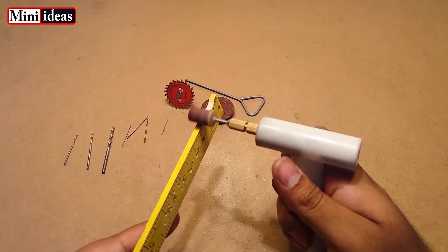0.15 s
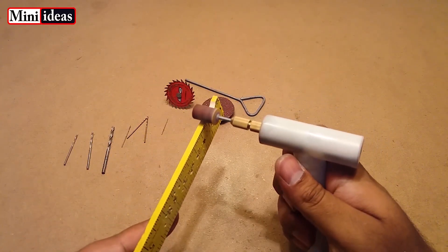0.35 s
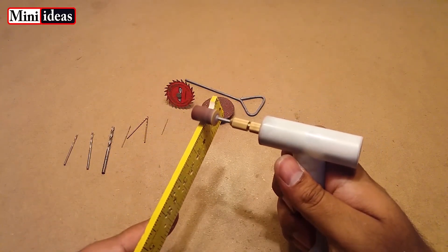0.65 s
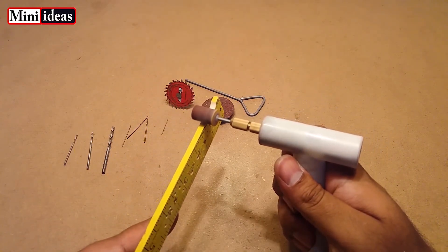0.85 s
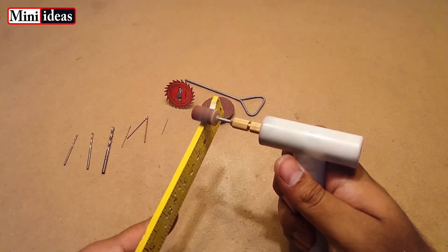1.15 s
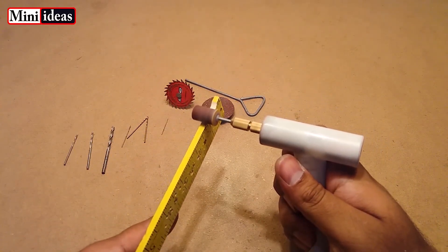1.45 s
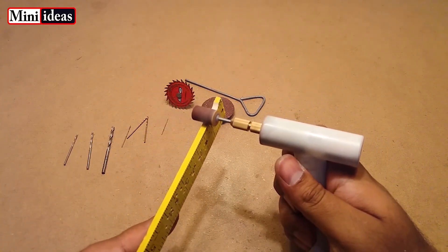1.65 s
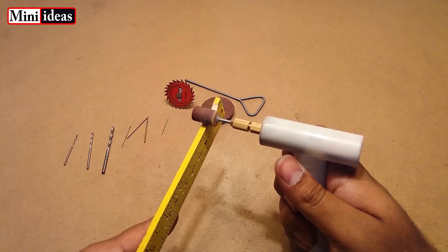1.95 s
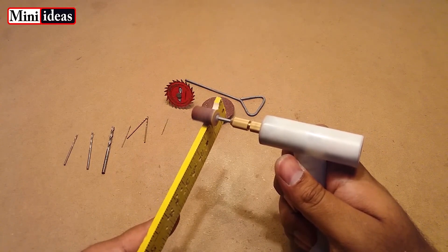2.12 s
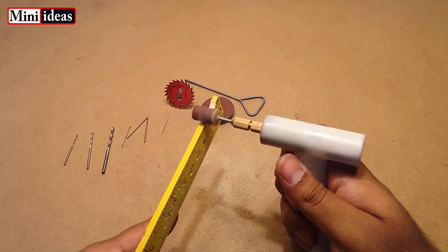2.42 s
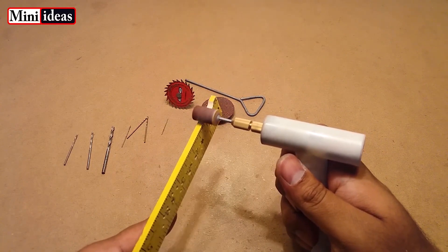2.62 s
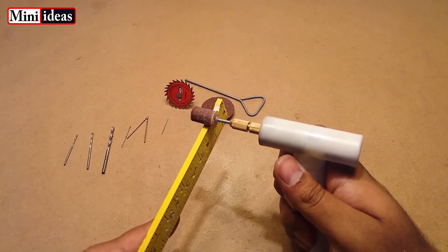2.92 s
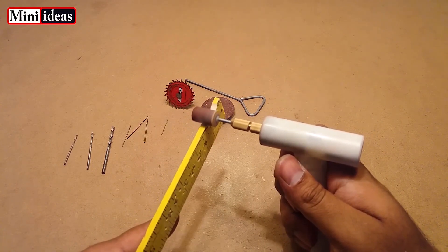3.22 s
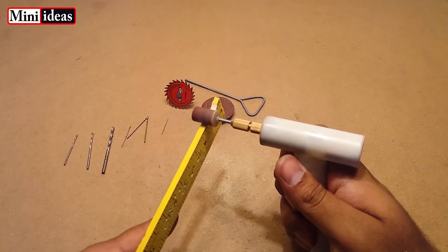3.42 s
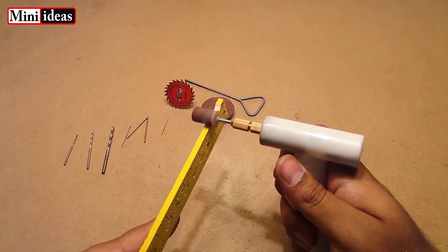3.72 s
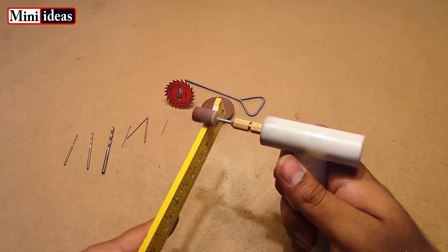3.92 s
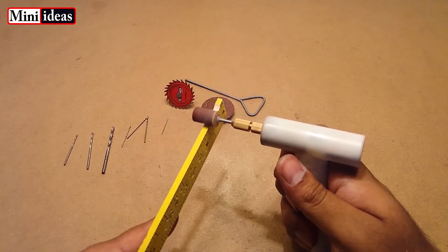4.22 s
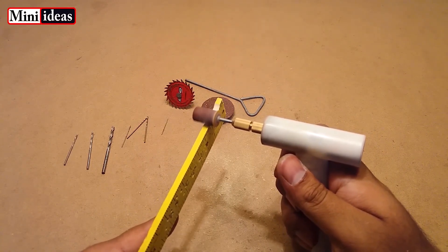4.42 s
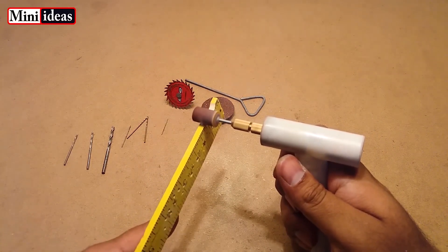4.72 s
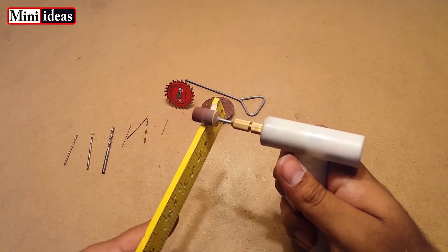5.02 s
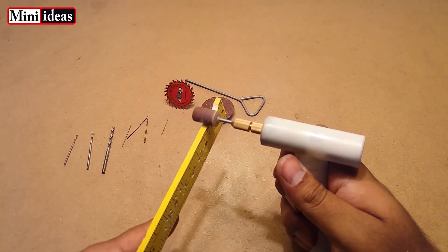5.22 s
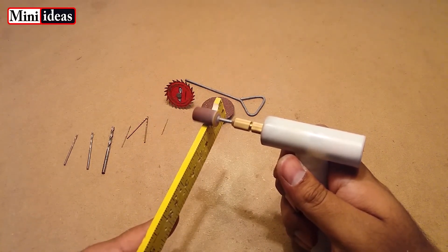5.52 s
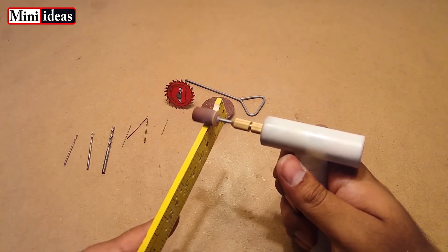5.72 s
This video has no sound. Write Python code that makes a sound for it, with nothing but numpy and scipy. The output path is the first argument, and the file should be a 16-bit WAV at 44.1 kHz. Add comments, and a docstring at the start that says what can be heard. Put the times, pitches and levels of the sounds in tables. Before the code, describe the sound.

Heard up close in a quiet room, a little motor-driven grinding stone whines against the edge of a steel tape measure. The pitch falls as it bogs down, turning into a gritty, chattering buzz with brief ringing tones from the blade. After a short surge the motor cuts out for a moment, jerks back to life and keeps grinding unevenly, slowing to a rattle once more before picking up speed.

```python
'''On a table, close by, a small hand-made drill presses a grinding stone against a steel tape measure.
The stone's high spot knocks on the blade's edge once a turn while its grit scrapes, and both excite
the resonances of the steel: the faster it turns, the louder and clearer. The blade skips at full speed,
and sings and whistles on multiples of the rotation rate; the unbalanced spindle hums, the motor growls.
Now and then the stone bites and drags the motor down; the drill stops briefly, restarts and labours on.'''
import sys
import numpy as np
from scipy import signal
from scipy.fft import rfft, irfft
from scipy.io import wavfile
from scipy.ndimage import uniform_filter1d

SR = 44100
rng = np.random.default_rng(int(sys.argv[2]) if len(sys.argv) > 2 else 0)


def to_wav(s):
    """Save 16-bit WAV."""
    ch = np.atleast_2d(s).T  # columns
    pcm = np.round(np.clip(ch, -1, 1) * 32767)  # PCM
    wavfile.write(sys.argv[1], SR, pcm.astype(np.int16))


N = 258426

# The stone bites into the edge. Each row: start and end in seconds, share of the speed lost,
# then dB added to knock, hard bite and steadiness.
STONE_BITES = [(0.714, 0.773, 0.084, -1.5, 2, 0.5), (.85, .9, 0.015, -1, 5, -1.5),
               (1.155, 1.25, .13, 2.5, 2.6, -0.5), (1.25, 1.32, .08, 0.5, 2.5, -3.5),
               (1.389, 1.44, 0.16, 1, 2.5, -2), (1.515, 1.555, 0.17, 4, 5.5, -1),
               (1.635, 1.68, 0.16, 3, 1.5, -8), (2.408, 2.479, .12, 5, 5, -5),
               (3.543, 3.592, 0.14, 4.5, 3, -10.5), (3.63, 3.69, 0.22, 3, 7, -5),
               (3.675, 3.765, 0.13, 3.5, 7.5, -0.5), (3.89, 3.975, .2, 5, 8, -1.5),
               (4.1, 4.16, 0.2, 5.5, 7.5, -4), (4.16, 4.235, 0.094, 2, 3, -3),
               (4.3, 4.414, 0.12, 3, 5.5, -7), (4.44, 4.57, 0.15, 0.5, 3, -1.5),
               (5.59, 5.698, 0.13, 1, 6, 1)]
# The drill runs down, rests and starts with a jerk. Each row: time in seconds, gain in dB.
MOTOR_RUNNING = [(2.76, -3), (2.82, -8.5), (2.87, -35), (2.992, -45), (3.002, -14.5), (3.045, -1)]
# The blade's main resonance moves with the point of contact.
# Each row: time in seconds, frequency in Hz, relative strength in dB.
MAIN_RESONANCE = [(0, 1360, 1), (.33, 1130, 2), (.42, 1070, -9), (.5, 1540, -6), (.68, 1510, 7),
                  (.95, 1750, -13), (1.4, 1600, 8), (1.58, 1500, 6.5), (1.8, 1200, -28), (2.3, 1070, 6.5),
                  (2.46, 1556, 6), (2.7, 1200, -3), (3.3, 1140, -24), (3.55, 1139, -2), (3.72, 1560, -12),
                  (3.85, 1770, 2.5), (4.35, 1787, 3.5), (4.55, 1681, 8), (4.74, 1646, -5), (4.86, 1095, 12),
                  (5.3, 1130, -3), (5.5, 1405, 5.5), (5.86, 1160, -9)]


def from_db(db):
    """Decibels as an amplitude ratio."""
    return 10 ** (np.asarray(db) / 20)


def unit_power(x):
    """Normalisation to a mean square of one."""
    return x / np.sqrt(np.mean(x ** 2) + 1e-20)


def evened(x, size=1100):
    """Gain control: the running power is held at one."""
    power = uniform_filter1d(uniform_filter1d(x ** 2, size), size)
    return x / np.sqrt(np.maximum(power, 0) + 1e-6 * np.mean(x ** 2))


def look_up(rows, at):
    """Linear interpolation of a table's later columns along its first."""
    axis, *columns = np.transpose(rows)
    return [np.interp(at, axis, column) for column in columns]


def in_time(rows):
    """Interpolation of a timed table at every sample."""
    return look_up(rows, np.arange(N) / SR)


def during(rows, column, start_lag_s=0, end_lag_s=0, ramp_s=.03):
    """Superposed trapezoids: each row's value sets in, holds and lets go."""
    t, total = np.arange(N) / SR, np.zeros(N)
    for row in rows:
        inside_s = np.minimum(t - row[0] - start_lag_s, row[1] + end_lag_s - t)
        total += row[column] * np.clip(inside_s / ramp_s + .5, 0, 1)
    return total


def band(x, edges_hz, kind, order=4):
    """Filtering with a maximally flat passband."""
    return signal.sosfilt(signal.butter(order, edges_hz, kind, fs=SR, output="sos"), x)


def coloured(x, spectrum, modes=(), size=8192):
    """Minimum-phase filtering: resonant peaks stand on a broad spectrum of (Hz, dB) points."""
    hz = np.maximum(np.fft.rfftfreq(size, 1 / SR), 1)
    points = np.array(spectrum)
    db = np.interp(np.log(hz), np.log(points[:, 0]), points[:, 1])
    db = db + sum(lift / (1 + (2 * (hz - centre) / width) ** 2) for centre, width, lift in modes)
    cepstrum = irfft(np.log(from_db(db)))[:size // 2]
    cepstrum[1:] *= 2
    response = irfft(np.exp(rfft(cepstrum, size)))[:size // 2]
    return signal.fftconvolve(x, response)[:N]


def clicks(turns, at_turn, sizes):
    """Fractional delay: an impulse at each given spindle angle is shared between two samples."""
    at = np.interp(at_turn, turns, np.arange(N)).ravel()
    sizes = (sizes * (at_turn > turns[0]) * (at_turn < turns[-1])).ravel()
    whole, part = at.astype(int), at % 1
    before = np.bincount(whole, sizes * (1 - part), N + 1)
    after = np.bincount(whole + 1, sizes * part, N + 1)
    return (before + after)[:N]


def harmonic(cycles, k):
    """A sinusoid locked to k times a rate, with a random starting phase."""
    return np.sin(2 * np.pi * (k * cycles + rng.random()))


def harmonics_near(turns, speed, centre_hz, width_hz, count=34):
    """Forced vibration: each harmonic of the rotation swells as it passes through a resonance."""
    return np.sqrt(2) * sum(np.exp(-.5 * ((k * speed - centre_hz) / width_hz) ** 2) * harmonic(turns, k)
                            for k in range(1, count + 1))


def spindle_speed(lag_s=.055):
    """Inertia: every bite brakes the motor, whose speed in turns per second follows with a lag."""
    # The spindle between bites. Each row: time in seconds, speed in turns per second.
    free_speed = [(0.0, 506.0), (0.24, 503.6), (0.363, 379.7), (0.575, 251.7), (0.917, 200.4),
                  (1.315, 185.4), (1.61, 155.3), (1.783, 126.9), (1.97, 89.1), (2.277, 231.1),
                  (2.363, 212.3), (2.577, 117.3), (2.882, 30.6), (2.98, 30.2), (3.141, 161.0),
                  (3.292, 182.5), (3.545, 191.9), (3.87, 181), (4.09, 166), (4.29, 170), (4.69, 153),
                  (4.8, 112), (4.88, 80), (5.12, 62), (5.27, 123), (5.39, 150), (5.58, 144.5),
                  (5.86, 146.5)]
    decay = np.exp(-1 / (lag_s * SR))
    drag = signal.lfilter([1 - decay], [1, -decay], during(STONE_BITES, column=2))
    return in_time(free_speed)[0] * (1 - drag)


def contact(speed, take_hold_s=.022, let_go_s=.0075):
    """Friction: speed and load set four levels and the steadiness (periodic over random sound), in dB."""
    # Faster turning is mostly louder and more regular. Each row: speed in turns per second,
    # then base thud, knock, hard bite, scrape and steadiness in dB.
    by_speed = [(61, -53, -43.5, -43.5, -37.5, -2), (96, -49.5, -39.5, -40.5, -38, 5.5),
                (143.73, -47.5, -34, -36.5, -37.5, 11), (193, -46.5, -32.5, -31.5, -34.5, 12.5),
                (253, -43.5, -32, -26, -28.5, 15), (370, -43.5, -32, -26.5, -30.5, 7),
                (516, -42, -30, -25.5, -36, 1.5)]
    # How firmly the hand holds edge and stone together. Each row: time in seconds, pressure in dB.
    hand_pressure = [(0, 1.5), (.15, 1.5), (.4, 1), (1.1, 3.5), (1.8, 5), (1.95, -2), (2.25, -0.5),
                     (2.5, 1.5), (2.78, 5), (3.02, 1.5), (3.15, -11), (3.21, -0.5), (3.65, -1),
                     (4.25, -0.5), (4.75, 1.5), (5.03, -3), (5.25, 3), (5.4, -2.5), (5.73, -2.5), (5.86, 1)]
    # The fine scrape swells and fades. Each row: time in seconds, gain in dB.
    scrape_swell = [(0, -3.5), (.28, 4), (.4, 0.1), (1.1, 2), (1.6, 4), (1.95, 0.5), (2.17, 1.5),
                    (2.28, -4.5), (2.5, 2), (2.76, 2), (3.13, -4), (3.22, -2), (4.3, -0.5), (4.9, 0),
                    (5.03, -5.5), (5.2, 0.5), (5.45, -1.5), (5.86, -2.5)]
    # The stone runs clean or chatters at no cost in speed.
    # Each row: start and end in seconds, then dB added to knock, hard bite and steadiness.
    spells = [(.095, .232, 0.5, 1.5, 7), (.3, .6, 1.5, -0.5, -2.5), (.665, .725, 1, 1.5, 5.5),
              (1.06, 1.15, .5, 1.5, 2), (1.29, 1.385, -0.5, -.5, 1), (1.46, 1.52, -0.5, 1, 6),
              (1.555, 1.61, -3, 1, 3), (1.72, 1.8, -0.5, -1, 4), (1.83, 2.17, 0, 1.5, -10),
              (2.19, 2.31, 3.5, .5, -11.5), (2.33, 2.405, 0.5, -2, 6), (2.47, 2.61, -0.5, 1.5, 1),
              (3.1, 3.28, 1, 2, -8), (3.32, 3.345, 2.5, 1, -8), (3.345, 3.44, 1, -1, -14.5),
              (3.46, 3.55, -1.5, -1.5, 3.5), (3.595, 3.64, -2.5, -4.5, 4.5), (3.8, 3.875, 1, 0, -4),
              (4.03, 4.1, -1, -1, 2.5), (4.235, 4.29, -1.5, -1.5, 8), (4.635, 4.7, -1, -1.5, 2),
              (5.39, 5.59, -2.5, 4, 3), (5.79, 5.88, 0.5, 1.5, 6)]
    thud_db, knock_db, bite_db, scrape_db, steadiness_db = look_up(by_speed, speed)
    pressure_db, running_db = in_time(hand_pressure)[0], in_time(MOTOR_RUNNING)[0]
    # the grit takes hold a moment after the motor feels the drag
    heavy_db, hard_db, smooth_db = [during(STONE_BITES, k + 1, take_hold_s, let_go_s) + during(spells, k)
                                    for k in (2, 3, 4)]
    change_per_s = uniform_filter1d(np.abs(np.gradient(np.log(speed))) * SR, 1500)
    slip_db = np.minimum(2.5 * change_per_s, 3.5)   # the stone slips while its speed changes
    return (thud_db + running_db + .81 * (pressure_db + heavy_db),
            knock_db + running_db + .76 * pressure_db + heavy_db,
            bite_db + running_db + pressure_db + hard_db,
            scrape_db + running_db + in_time(scrape_swell)[0] + .44 * hard_db,
            steadiness_db - slip_db + smooth_db)


def knocks(turns, steadiness_db, grit=.31, arc_turns=.1337, wander_turns=16, bump_count=10):
    """Periodic impact: the high spot strikes once a turn, and smaller bumps follow it."""
    # The blade bounces in step with the stone. Each row: start and end in seconds,
    # turns per bounce, swing of strength in dB, swing of timing in turns.
    bounces = [(-.05, 0.238, 5, 17.5, 0.12), (0.45, 0.647, 2, 2, 0.0066), (0.892, 1.151, 3, 1, 0.0024)]
    turn = np.arange(int(turns[-1]) + 1)
    at = np.interp(turn, turns, np.arange(N))
    when, speed = at / SR, np.interp(turn, turns, np.gradient(turns) * SR)
    chance = rng.standard_normal((2000, bump_count + 2))[:len(turn)]
    # the bumps grow and fade as the contact wanders
    memory = np.exp(-1 / wander_turns)
    bumps = grit * unit_power(signal.lfilter([1], [1, -memory], chance[:, 2:], axis=0))
    # an unsteady contact scatters both the force and the moment of each knock
    scatter = np.clip(from_db(10 - np.interp(at, np.arange(N), steadiness_db)), .25, 2)
    strength_db = .04 * scatter * chance[:, 0]
    late_turns = 22e-6 * speed * scatter * chance[:, 1]
    for start, end, period, swing_db, swing_turns in bounces:
        phase = 2 * np.pi * turn / round(period)
        active = (when > start) & (when < end)
        strength_db += active * swing_db * np.cos(phase)
        late_turns += active * swing_turns * np.cos(round(period) // 2 * phase + 1)
    angles = np.r_[0, arc_turns * rng.exponential(1, bump_count)]
    sizes = np.c_[np.ones(len(turn)), bumps] * from_db(strength_db)[:, None]
    return clicks(turns, (turn + late_turns)[:, None] + angles, sizes)


def abrasion(turns, base_pressure, arc_turns, grain_db):
    """Abrasive wear: grains break off at random, hardest just after the high spot lands."""
    pressure = base_pressure + np.exp(-(turns % 1) / arc_turns)
    return pressure * rng.standard_normal(N) * from_db(grain_db * np.minimum(rng.exponential(1, N), 5))


def steel(force, reflection=.33):
    """Modal response: the blade colours a force, and waves running to and fro smear it in time."""
    # Resonances of blade, tool and table. Each row: frequency in Hz, width in Hz, lift in dB.
    modes = [(156.4, 25, 16.5), (1105, 183, 8), (1614, 99, 4), (2010, 490, 14.5), (2248, 136, 3),
             (2520, 16, 7), (2860, 42, 6), (3176, 39, 9), (3347, 110, 6.5), (3620, 460, 4), (4086, 115, 7),
             (4286, 180, 6.5), (4840, 380, 4), (5475, 100, 5.5), (5853, 580, 7.5), (6206, 234, 10),
             (6515, 130, 8.5), (7480, 140, 6), (8160, 274, 12.5), (8820, 126, 10), (9140, 110, 11),
             (9640, 80, 6), (10160, 320, 8.5), (10556, 170, 14), (11100, 190, 11), (12140, 330, 8.5),
             (13100, 450, 8), (14900, 540, 5)]
    # Their broad colour. Each row: frequency in Hz, relative level in dB.
    body = [(65, -40), (115, -14), (210, -9), (310, -3), (420, 2.5), (500, 0.5), (630, 3.5), (800, 3.5),
            (1700, 5.5), (2500, -2.5), (3200, -2.5), (4400, -5), (5400, -9), (10000, -7.5), (15700, -6.5)]
    vibration = coloured(force, body, modes)
    for lag_s in (.0005, .0011, .0023):   # all-pass loops keep the colour
        loop = np.r_[1, np.zeros(int(lag_s * SR)), reflection]
        vibration = signal.lfilter(loop[::-1], loop, vibration)
    return evened(vibration)


def ringing(x, width_hz=720, block=256):
    """Resonance: the blade's moving main mode lifts what lies near its pitch."""
    hz, strength_db = in_time(MAIN_RESONANCE)
    radius = np.exp(-np.pi * width_hz / SR)
    zeros = (1 - radius * radius) / 2 * np.array([1, 0, -1])
    ring, state = np.zeros(N), np.zeros(2)
    for i in range(0, N, block):
        poles = [1, -2 * radius * np.cos(2 * np.pi * hz[i] / SR), radius * radius]
        ring[i:i + block], state = signal.lfilter(zeros, poles, x[i:i + block], zi=state)
    return x + from_db(strength_db - 5) * ring


def skipping(turns, turns_per_landing=5):
    """Subharmonic motion: the blade lands once in several turns, giving clean tones on that rate."""
    # The tones of skipping. Each row: multiple of the landing rate, relative level in dB.
    partials = [(1, -45), (2, -39), (3, -3), (4, -20), (5, -6), (6, -36), (7, -41), (8, -46), (9, -2.5),
                (10, -31), (11, 3.5), (12, 1.5), (13, 8.5), (14, -19), (15, 7), (16, -5.5), (17, -37),
                (18, -10), (19, 2), (20, -14), (21, 4.5), (22, -15), (23, -1)]
    return unit_power(sum(from_db(db) * harmonic(turns / turns_per_landing, k) for k, db in partials))


def grinding(turns, speed, thud_top_hz=860, knock_top_hz=2200, bite_top_hz=5400):
    """Impact and friction drive the steel in four bands: low thud, knock, hard bite and fine scrape."""
    # At full speed the blade skips over the stone. Each row: time in seconds, share from 0 to 1.
    skip_share = [(0, .72), (.1, .88), (.2, .88), (.25, .35), (.28, 0)]
    skip = np.clip(in_time(skip_share)[0], 0, 1)
    thud_db, knock_db, bite_db, scrape_db, steadiness_db = contact(speed)
    periodic = from_db(1.3 * steadiness_db) * steel(knocks(turns, steadiness_db))
    chipping = steel(abrasion(turns, base_pressure=.67, arc_turns=.34, grain_db=4.5))
    rubbing = steel(abrasion(turns, base_pressure=.89, arc_turns=.81, grain_db=3.5))
    thud = np.sqrt(1 - skip) * evened(band(periodic + chipping, thud_top_hz, "low", order=8))
    knock = evened(band(ringing(periodic + chipping), [thud_top_hz, knock_top_hz], "band", order=6))
    knock = np.sqrt(1 - skip) * knock + np.sqrt(skip) * skipping(turns)
    cutting = band(from_db(-8) * periodic + chipping, [knock_top_hz, bite_top_hz], "band", order=6)
    # a fast stone bites more brightly
    fast = np.interp(speed, [190, 270], [0, 1])
    bright = coloured(cutting, [(knock_top_hz, -8), (2650, -2), (bite_top_hz, 1)])
    bite = evened((1 - fast) * cutting + fast * bright)
    scrape = band(from_db(-12) * periodic + rubbing, bite_top_hz, "high", order=8)
    # a skipping blade is barely cut, so its scrape is duller
    scrape = evened((1 - skip) * scrape + skip * band(scrape, 8000, "low", order=1))
    return (from_db(thud_db) * thud + from_db(knock_db) * knock
            + from_db(bite_db) * bite + from_db(scrape_db) * scrape)


def with_reflections(x, level_db=-14, reverb_s=.1, gap_s=.002):
    """Early reflections: the table and what stands around it return a short, faint spray of echoes."""
    t = np.arange(6000) / SR
    tail = rng.standard_normal(len(t)) * from_db(-60 * t / reverb_s) * (t > gap_s)
    return x + from_db(level_db) * signal.fftconvolve(x, tail / np.linalg.norm(tail))[:N]


def singing(turns, speed, threshold_db=6.5):
    """Sympathetic vibration: on a steady contact the main mode sings on the nearest harmonics."""
    _, knock_db, _, _, steadiness_db = contact(speed)
    hz, strength_db = in_time(MAIN_RESONANCE)
    steady = 1 / (1 + from_db(threshold_db - steadiness_db) ** 4)
    gain = steady * from_db(knock_db + strength_db - 10.5)
    return gain * harmonics_near(turns, speed, hz, width_hz=122, count=17)


def hum(turns, speed):
    """Rotating unbalance shakes the tool with one smooth cycle a turn."""
    # The shaking peaks at resonances. Each row: speed in turns per second, base level in dB.
    shake = [(65, -61), (115, -65), (147, -58.5), (190, -61.5), (300, -86), (380, -50), (505, -48)]
    # It grows while the stone bears on the edge. Each row: time in seconds, gain in dB.
    bearing_on = [(.4, 10), (1.15, 4.5), (1.3, 12), (1.62, 8), (1.8, -3), (2.42, 2), (2.52, 9), (2.8, -9),
                  (3.22, 7), (3.36, 10.5), (3.5, 1), (3.7, 5), (4.3, 6), (4.6, 8), (4.85, 7), (5.28, -1),
                  (5.45, 14), (5.62, 15.5), (5.75, -4.5)]
    level_db = look_up(shake, speed)[0] + in_time(bearing_on)[0]
    return band(from_db(level_db) * np.sin(2 * np.pi * turns), 124, "high")


def growl(turns, speed, half_power_speed=137):
    """Rotation harmonics: the running three-pole motor gives low tones that fade as it speeds up."""
    # The motor's tones. Each row: multiple of the speed, level in dB before fading.
    partials = [(3, -61), (4, -59), (6, -62), (9, -61), (12, -64)]
    tone = sum(from_db(db) * harmonic(turns, round(k)) for k, db in partials)
    running = from_db(in_time(MOTOR_RUNNING)[0])
    return np.sqrt(2) * running * tone / np.sqrt(1 + (speed / half_power_speed) ** 4)


def room_noise(level_db=-61):
    """Ambient noise: the quiet room gives a steady, mostly low rush."""
    # The room's spectrum. Each row: frequency in Hz, relative spectral density in dB.
    spectrum = [(30, -15), (60, -14.5), (130, 5), (300, -1), (700, -4.5), (1500, -17.5), (3500, -17),
                (7000, -29), (15500, -27)]
    return from_db(level_db) * unit_power(coloured(rng.standard_normal(N), spectrum))


def whistles(turns, speed):
    """Selective resonance: single modes of the blade briefly take up the nearest harmonics."""
    # A mode flares up. Each row: start and end in seconds, frequency in Hz, level on resonance in dB.
    flares = [(.32, 0.49, 1050, -37.5), (0.43, .52, 1640, -35), (0.65, 0.715, 2360, -30),
              (0.78, .84, 2280, -34.5), (0.917, 1.14, 1655, -38), (.93, 1.153, 1950, -37.5),
              (0.95, 1.15, 4130, -41), (1.08, 1.13, 2330, -35.5), (1.062, 1.12, 3460, -41),
              (1.222, 1.39, 1596, -36), (1.42, 1.537, 1570, -37), (1.548, 1.6, 2350, -38),
              (1.55, 1.64, 1220, -42.5), (2.345, 2.406, 2900, -40), (3.44, 3.557, 1984, -41.5),
              (3.446, 3.496, 4330, -39), (3.46, 3.64, 750, -48), (3.511, 3.55, 2900, -40),
              (3.572, 3.636, 1620, -45), (3.785, 3.904, 1000, -43.5), (4.46, 4.57, 839, -46.5),
              (4.645, 4.702, 2325, -40.5), (5.372, 5.63, 4268, -44), (5.52, 5.6, 3200, -43),
              (5.59, 5.66, 1849, -41)]
    sound = np.zeros(N)
    for start, end, hz, db in flares:
        gain = during([(start, end, from_db(db))], column=2)
        on = gain > 0
        sound[on] += gain[on] * harmonics_near(turns[on], speed[on], hz, width_hz=114)
    return sound


def scene():
    """Superposition: one spindle drives every sound of the tool; both channels are alike."""
    speed = spindle_speed()
    turns = np.cumsum(speed) / SR
    room = room_noise()
    blade = with_reflections(grinding(turns, speed)) + singing(turns, speed) + whistles(turns, speed)
    mono = blade + hum(turns, speed) + growl(turns, speed) + room
    return np.array([mono, mono])


def record(dry, cutoff_hz=15800):
    """Band limiting: a steep low-pass filter removes the highest treble."""
    return signal.sosfilt(signal.ellip(12, .1, 80, cutoff_hz, fs=SR, output="sos"), dry)


dry = scene()
out = record(dry)
to_wav(out)
```